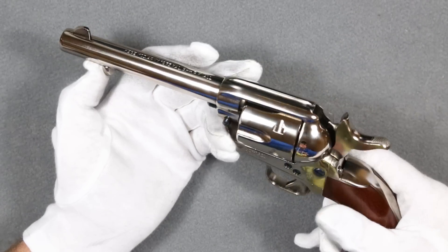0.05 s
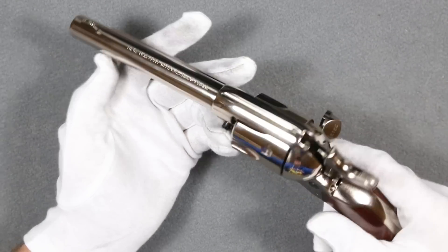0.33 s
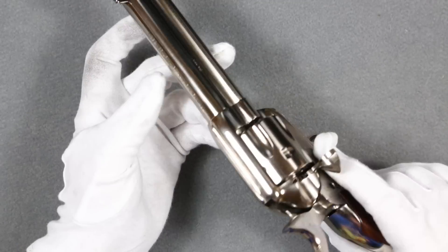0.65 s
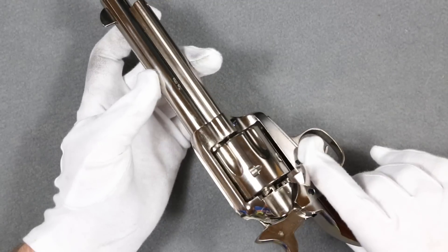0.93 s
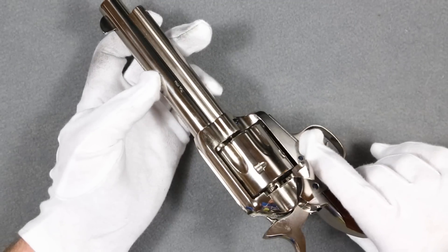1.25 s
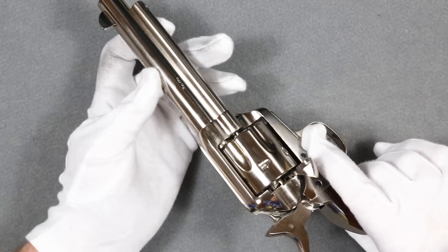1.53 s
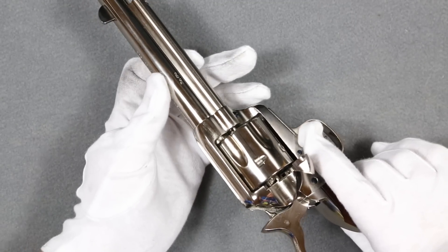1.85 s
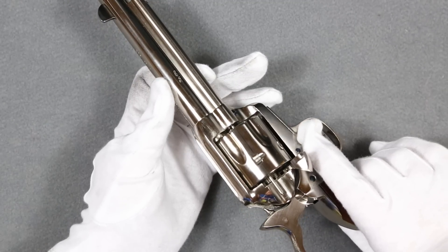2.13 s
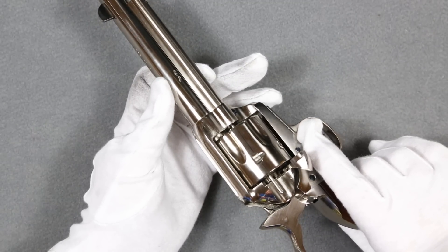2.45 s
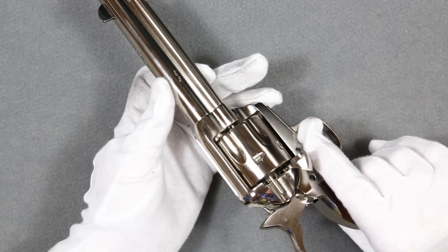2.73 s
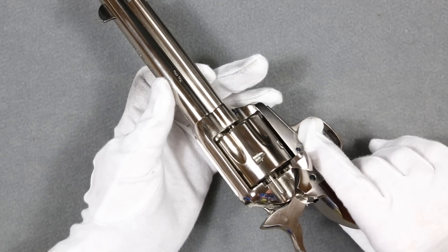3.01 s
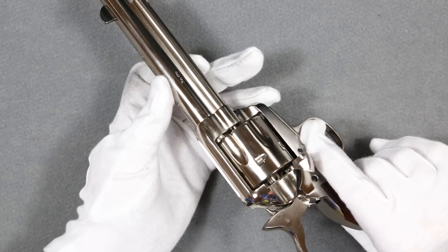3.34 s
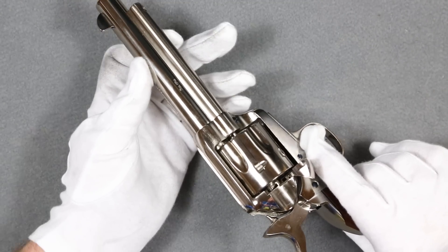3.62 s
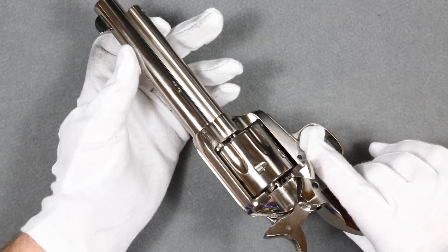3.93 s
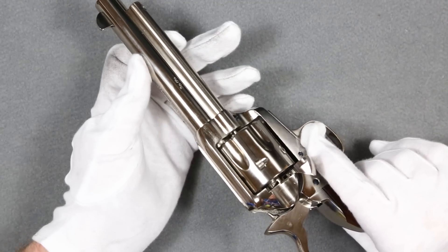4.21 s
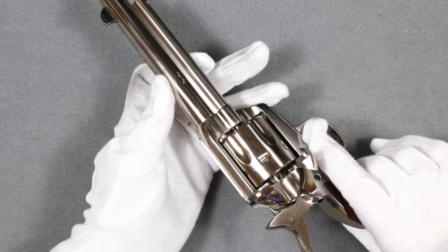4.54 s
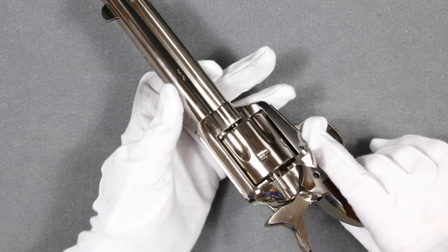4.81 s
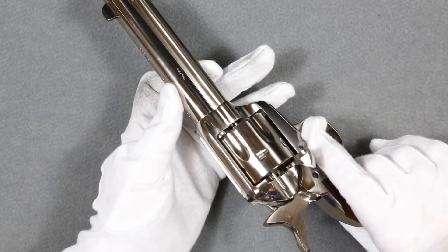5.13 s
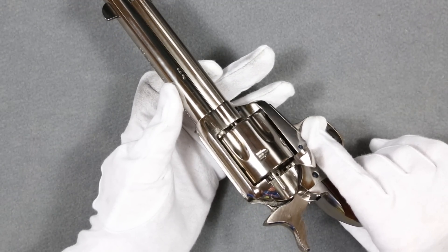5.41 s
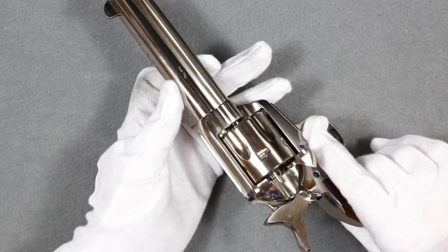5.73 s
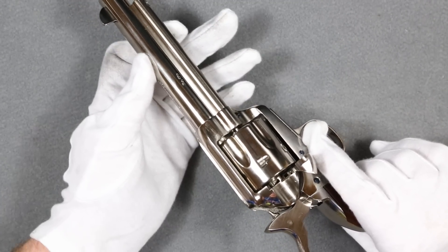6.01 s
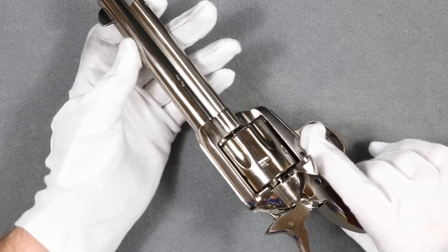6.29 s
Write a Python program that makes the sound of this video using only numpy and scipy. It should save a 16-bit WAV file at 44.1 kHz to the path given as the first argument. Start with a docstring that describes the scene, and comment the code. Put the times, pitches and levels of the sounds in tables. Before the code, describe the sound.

In a small room with a low, steady machine hum, gloved hands work a revolver right by the microphone. Its action gives crisp, quickly damped metal clicks at the start. Three times the spring-loaded rod is pushed to and fro, scraping lightly in its housing while the coils catch and tick. Firmer clicks close the first and last of these passes. The sound is close and fairly dry.

```python
"""A steel revolver, worked in gloved hands close to the microphone in a small room with a low hum.
The action clicks: each contact rings the hand-damped steel for a few milliseconds. The sprung ejector
rod slides along the barrel and back, scraping in tiny slips against its housing, while the coils of
its spring rasp, catch and tick. A cotton glove brushes the steel once. Behind the gun are a faint
echo off the table, a short room tail and the drone of a fan-like machine."""
import sys
import numpy as np
from scipy import signal
from scipy.fft import rfft, irfft, next_fast_len
from scipy.io import wavfile

SR = 44100
rng = np.random.default_rng(int(sys.argv[2]) if len(sys.argv) > 2 else 0)


def generate_wav(signal):
    """Clip the signal to [-1, 1] and save it as 16-bit WAV at the path in sys.argv[1]."""
    frames = np.transpose(np.atleast_2d(signal))
    scaled = np.clip(frames, -1, 1) * 32767
    pcm = np.round(scaled).astype(np.int16)
    wavfile.write(sys.argv[1], SR, pcm)


N = 289418
TIME = np.arange(N) / SR


def gain_of(db):
    """Decibels to amplitude."""
    return 10 ** (np.asarray(db) / 20)


def evened(x):
    """Scales to an rms of one."""
    return x / np.sqrt(np.mean(abs(x) ** 2) + 1e-20)


def total_db(power):
    """Level of the summed power of all bands."""
    return 10 * np.log10(power.sum(0) + 1e-12)


def read(points, hz):
    """Reads a table on a logarithmic frequency axis."""
    f, value = np.transpose(points)
    return np.interp(np.log(hz + 1), np.log(f), value)


def add(mix, s, sound):
    """Mixes a sound in at s seconds."""
    part = mix[max(round(s * SR), 0):][:len(sound)]
    part += sound[:len(part)]


def wander(width_hz, size=2 ** 15):
    """Slow complex random drift of a given bandwidth."""
    t = np.linspace(0, N / SR, size)
    spectrum = rng.standard_normal(size) + 1j * rng.standard_normal(size)
    spectrum *= np.exp(-(np.fft.fftfreq(size, t[1]) / width_hz) ** 2)
    return evened(np.interp(TIME, t, np.fft.ifft(spectrum)))


def noise(colour):
    """Noise of a given colour, at an rms of one."""
    length = next_fast_len(N)
    gain = gain_of(read(colour, np.fft.rfftfreq(length, 1 / SR)))
    return evened(irfft(rfft(rng.standard_normal(length)) * gain, length)[:N])


def causal(gain):
    """The minimum-phase impulse response with this gain: it starts at once and rings out."""
    log_gain = np.log(np.r_[gain, gain[-2:0:-1]] + 1e-6)
    return irfft(np.exp(np.conj(signal.hilbert(log_gain)))[:len(gain)])


def resonate(x, hz, width_hz):
    """A steep resonance that may follow a moving pitch."""
    turn = np.exp(2j * np.pi * np.cumsum(hz * np.ones(len(x))) / SR)
    r = np.exp(-np.pi * width_hz / SR)
    return 2 * (turn * signal.lfilter([(1 - r) ** 2], [1, -2 * r, r * r], x / turn)).real


def bands(hz, edges_hz=(4500, 8000, 11000)):
    """Soft masks for the four bands in which the steel rings, around 3, 6, 9 and 13 kHz."""
    above = [1 / (1 + (edge / (hz + 1)) ** 24) for edge in edges_hz]
    return -np.diff([np.ones(len(hz)), *above, np.zeros(len(hz))], axis=0)


def shares(low_db, high_db, top_db):
    """Band amplitudes, total power one, from a colour: the 3, 9 and 13 kHz bands against 6 kHz."""
    gains = gain_of([low_db, 0, high_db, top_db])
    return gains / np.linalg.norm(gains, axis=0)


def tinted(bright_db, base_db):
    """Colour of a contact: the sharper the edge, the more of the upper bands."""
    return [base + slope * bright_db for base, slope in zip(base_db, (-0.052, 0.48, 0.91))]


def hum(drone_hz=70, swell_s=0.17):
    """Room tone from a fan-like machine: wavering lines and a deep, swelling drone in a rush of air."""
    # colour of the air: f/Hz, relative level/dB
    air = [(15, -50), (25, -35), (37, -10.5), (52, -17.5), (70, -14), (125, -6.5), (175, -7), (225, -2),
           (280, -1.5), (370, -13.5), (620, -13.5), (950, -21), (1400, -21), (2400, -26), (4000, -29),
           (9000, -33.5), (16000, -39.5)]
    # hum lines: f/Hz, level/dB, width of wavering/Hz, steady share/0-1
    lines = [(130.3, -44.5, 6.6, 0.73), (142, -52, 2.5, 0.8), (108, -56, 3.2, 0.84),
             (219.8, -46.5, 10.3, 0.02), (262.4, -47.5, 5.6, 0), (297, -50.5, 1.55, 0.28),
             (428.6, -49.5, 2.3, 0.94), (550.7, -58.5, 8, 0), (626.6, -58.5, 9.3, 0.4),
             (1167, -64.5, 2.2, 0.89), (1335, -64.5, 6, 0), (3276, -61.5, 105, 0)]
    # crests of the drone: t/s, level/dB
    swells = [(4.92, -51), (5.65, -52), (6.37, -48.5)]
    out = gain_of(-39.5) * noise(air)
    for hz, db, width, steady in lines:
        sway = np.sqrt(steady) + np.sqrt(1 - steady) * wander(width)
        tone = np.exp(2j * np.pi * (hz * TIME + rng.random()))
        out += gain_of(db) * evened((sway * tone).real)
    drone = evened(((1 + 0.73 * wander(7)) * np.exp(2j * np.pi * drone_hz * TIME)).real)
    swell = sum(gain_of(db) * np.exp(-((TIME - s) / swell_s) ** 2) for s, db in swells)
    return out + (gain_of(-61.5) + swell) * drone


def room(x):
    """What returns to the microphone: faint echoes off the table, then a tail whose top dies first."""
    # reverberation time: f/Hz, t60/s
    decay = [(500, 0.33), (3000, 0.36), (7000, 0.35), (10000, 0.4), (15000, .2)]
    # strength of the tail: f/Hz, level/dB
    colour = [(500, 6), (3000, -11), (7000, -15), (10000, -16), (15000, -15)]
    count = SR * 3 // 4
    reflections = rng.standard_normal(count) * (rng.random(count) < 5000 / SR)
    hz, t, spectra = signal.stft(evened(reflections), SR, nperseg=256)
    t60 = read(decay, hz)[:, None]
    spectra *= gain_of(read(colour, hz)[:, None] - 60 * t / t60)
    spectra *= np.sqrt(2 * np.log(1000) / (t60 * SR))  # energy independent of decay time
    tail = signal.istft(spectra * np.clip(t / 0.0059, 0, 1), SR, nperseg=256)[1]
    for delay_s, db in [(.0032, -14), (.0068, -19.5), (.0105, -31)]:
        tail[round(delay_s * SR)] += gain_of(db)
    return signal.fftconvolve(x, tail)[:N]


def push(start, rise, fall, db, slow_db=9.5, stop_s=0.017):
    """Amplitude of one hand movement: it gathers speed, slows down and stops (times in s)."""
    from_peak = np.maximum((start + rise - TIME) / rise, (TIME - start - rise) / fall).clip(0, 2)
    moving = np.clip(1 + np.minimum(TIME - start, start + rise + fall - TIME) / stop_s, 0, 1)
    return moving * gain_of(db - slow_db * from_peak ** 1.63)


def glove():
    """Cotton fibres brush the steel in an uneven whisper as the gun is turned over."""
    # colour of the brushing: f/Hz, relative level/dB
    cotton = [(500, -30), (1500, -3), (3500, -2), (5000, -2), (7000, 2), (8500, -5), (10000, -5),
              (13000, -9), (16000, -17)]
    return push(start=.50, rise=.09, fall=0.1, db=-46) * gain_of(2.5 * wander(90).real) * noise(cotton)


def steel(modes, hz, broad_db, shift_db=0):
    """Gain of a steel part: its modes over a broad, dead response; small parts radiate little bass."""
    centre, width, db = np.transpose(modes)[:, :, None]
    peaks = np.sum(gain_of(db + shift_db) ** 2 / (1 + (2 * (hz - centre) / width) ** 2), 0)
    broad = gain_of(broad_db) ** 2 * hz ** 2 / (hz ** 2 + 1500 ** 2)
    return np.sqrt(peaks + broad) * hz / np.hypot(hz, 300)


def friction(slips_per_s, spread_db, judder_db, judder_hz, size=2048):
    """Tiny slips of uneven size, bunched by judder, ring the rod: one row for each band."""
    # modes of the ejector rod in its housing: f/Hz, width/Hz, relative level/dB
    rod_modes = [(1470, 170, -10), (2270, 190, -4.5), (2780, 230, 0), (3280, 300, 4.5), (3870, 190, 3.5),
                 (4240, 320, 1), (5300, 450, 0), (6000, 260, 1), (6730, 300, -3.5), (7280, 290, 4.5),
                 (8930, 700, -1.5), (9850, 300, -1), (10070, 320, -1.5), (12300, 330, -1), (12560, 520, -3),
                 (13460, 490, 0.5)]
    # the thumb damps the rod: t/s, share of dead, broad scraping/0-1
    thumb = [(1.76, 0.84), (1.82, 0.25), (4.1, 0), (4.25, 0.51), (4.40, 0.52), (4.47, 0.18), (6.12, 0.28),
             (6.22, 0.36)]
    slips = (rng.random(N) < slips_per_s / SR) * rng.choice([-1, 1], N)
    slips = slips * gain_of(spread_db * np.minimum(rng.exponential(1, N), 3))
    judder = np.clip(np.sqrt(2) * wander(judder_hz).real, -2, 2)
    slips *= gain_of(judder_db * judder - judder_db ** 2 * np.log(10) / 20)  # keeps the mean power
    hz, length = np.fft.rfftfreq(size, 1 / SR), next_fast_len(N + size)
    damping = np.interp(TIME, *np.transpose(thumb))
    free = evened(steel(rod_modes, hz, broad_db=-28) ** 1.05)  # rod and housing deepen the valleys
    dead = evened(steel(rod_modes, hz, broad_db=-1.5))
    rung = rfft(slips * (1 - damping), length) * rfft(causal(free), length)
    rung += rfft(slips * damping, length) * rfft(causal(dead), length)
    parts = irfft(rung * bands(np.fft.rfftfreq(length, 1 / SR)), length)[:, :N]
    return np.array([evened(part) for part in parts])


def travel():
    """The hand pushes the rod to and fro: rubbing power in each band over time."""
    # pushes: t/s, speeding up/s, slowing down/s, relative level at full speed/dB, brightness/dB
    strokes = [(1.665, 0.034, 0.077, -36, -4), (1.80, 0.065, 0.088, -34, 1),
               (1.995, 0.099, 0.036, -36.5, -3.5), (3.59, .05, 0.14, -34, 1), (3.79, 0.091, .11, -45, -1),
               (4.235, 0.11, .10, -36.5, -0.5), (4.42, .11, .10, -33, 0.5), (4.64, 0.093, 0.065, -38.5, -7),
               (4.88, 0.064, 0.029, -37.5, -0.5), (5.884, 0.093, .08, -32.5, -1.5),
               (5.99, 0.068, .13, -32, 0), (6.17, 0.12, .04, -35, -0.5)]
    return sum(np.outer(shares(*tinted(bright, base_db=(0, -1.5, 0.5))), push(*move)) ** 2
               for *move, bright in strokes)


def slide(power):
    """The rod and its spring rub along the housing; the slower they go, the more they stick and slip."""
    slow = np.clip((-32.5 - total_db(power)) / 8, 0, 1)
    grain = friction(slips_per_s=2500, spread_db=1.5, judder_db=1.8 + 1.25 * slow, judder_hz=130)
    return gain_of(-1.03) * (np.sqrt(power) * grain).sum(0)


def scuffs(rise_s=0.0048, fall_s=0.0017):
    """Steel grips and drags briefly where the thumb presses harder."""
    # short scrapes: t/s, length/s, relative level/dB, brightness/dB
    scrapes = [(0.001, 0.019, -32, -4), (0.025, 0.023, -32, -10), (1.566, 0.02, -37.5, -18),
               (1.59, 0.0064, -34, 0), (1.68, .019, -24.5, 2), (1.704, 0.042, -27, 0),
               (1.962, 0.016, -31, 5), (2.128, 0.0067, -30.5, -4), (2.173, .007, -38, 2),
               (2.224, .011, -32.5, 0), (2.242, 0.0098, -31.5, 3), (2.254, .022, -35, -3),
               (2.309, 0.014, -32, -1), (3.345, .01, -39, 0), (3.453, 0.018, -24.5, -6),
               (3.475, 0.045, -29, -2.5), (3.516, .031, -38, -1), (3.635, 0.0085, -28, 9),
               (3.957, .02, -40.5, -6), (4.026, 0.0089, -41, -3), (4.474, 0.017, -31, -2),
               (4.531, 0.021, -28.5, 7), (4.759, 0.011, -36, 0), (4.783, .013, -34.5, -4),
               (4.914, .0065, -32.5, -8), (4.961, .007, -33, -2), (6.056, 0.03, -28, 2),
               (6.42, 0.0095, -41, -17)]
    power = np.zeros((4, N))
    t = np.arange(SR // 8) / SR
    for s, length, db, bright in scrapes:
        stroke = np.minimum(t / rise_s, 1) * np.exp(-np.maximum(t - length, 0) / fall_s)
        for band, share in zip(power, shares(*tinted(bright, base_db=(0, -.5, 1)))):
            add(band, s - rise_s / 2, (gain_of(db - 3.5) * share * stroke) ** 2)
    grain = friction(slips_per_s=4500, spread_db=3, judder_db=3.0, judder_hz=220)
    return (np.sqrt(power) * grain).sum(0)


def rasps(slips_per_s=2500):
    """Slips of the spring feed one narrow resonance that glides as the coils close."""
    # drags of the spring: t/s, length/s, first f/Hz, last f/Hz, nominal width/Hz, level/dB
    drags = [(1.672, 0.058, 2850, 2900, 160, -39), (1.703, 0.031, 5420, 5360, 220, -31.5),
             (2.268, 0.043, 2270, 2360, 110, -34.5), (2.284, 0.029, 5100, 5160, 500, -30.5),
             (3.448, 0.054, 2300, 2340, 160, -41), (3.450, 0.042, 5850, 5760, 200, -37),
             (3.952, 0.034, 3100, 3100, 420, -34.5), (4.527, 0.052, 4400, 4200, 550, -35.5),
             (5.929, 0.079, 4370, 4060, 600, -35.5), (6.054, 0.039, 3720, 3300, 600, -32.5)]
    out = np.zeros(N)
    t = np.arange(SR // 5) / SR
    for s, length, first_hz, last_hz, width, db in drags:
        slips = rng.standard_normal(len(t)) * (rng.random(len(t)) < slips_per_s / SR)
        ring = resonate(slips, np.interp(t, [0, length], [first_hz, last_hz]), 1.44 * width)
        add(out, s, gain_of(db) * evened(ring) * np.sin(np.pi * np.minimum(t / length, 1)))
    return out


def coil_ticks(power, catches_per_s=14, still_db=-50, bright_db=8, ring_hz=12900, count=96):
    """Lists the spring's firm snaps, and light chance catches whose level follows the rod's speed."""
    # coils snap past the edge of the housing: t/s, relative level/dB, brightness/dB, ring f/Hz
    snaps = [(1.752, -23.5, -1.5, 9300), (1.8399, -18, 5, 9900), (1.8446, -20.5, 5, 13680),
             (1.9343, -35, 0, 7140), (2.3642, -43, 7, 13000), (3.508, -31, -20, 3430),
             (3.5566, -37, -6, 5090), (3.6571, -31, 10, 12740), (3.7546, -22.5, -2, 10400),
             (3.788, -21.5, -0.5, 9800), (3.8178, -24.5, 1, 7100), (3.8523, -30.5, -1, 9830),
             (3.8805, -38, -2, 11900), (4.3785, -27.5, -3, 11500), (4.4323, -19, -0.5, 9300),
             (4.4613, -24, 5, 9860), (4.7662, -36.5, -3, 13040), (4.8073, -38, 10, 10000),
             (6.1476, -21.5, 2.5, 10030), (6.1802, -20, 2, 6800), (6.2073, -22.5, 1, 9300),
             (6.2251, -28, -1, 3260)]
    times = np.cumsum(.5 + rng.random(count)) / catches_per_s
    offsets_db = 2 * rng.standard_normal(count) - 0.5
    sliding_db = np.interp(times, TIME, total_db(power))
    catches = [(s, db + offset, bright_db, ring_hz)
               for s, db, offset in zip(times, sliding_db, offsets_db) if db > still_db]
    return snaps + catches


def click(db, colour, ring_hz, focus, contact_s, size=4096):
    """A brief chatter of contact rings the steel; the place of the blow decides which modes speak."""
    # modes of the gun's steel: f/Hz, width/Hz, relative level/dB
    frame_modes = [(1410, 220, -25), (2380, 100, 0), (2900, 190, 7.5), (3120, 120, 4), (3495, 98, 7.5),
                   (3800, 360, 1), (4050, 130, 5), (4570, 170, 1.5), (5310, 350, -6.5), (5880, 260, 4.5),
                   (6670, 87, -0.5), (7110, 240, 5), (7740, 280, 1), (8670, 280, 0.5), (9230, 220, 1),
                   (9800, 290, -1), (11100, 400, -11), (11760, 340, -6.5), (12700, 210, -2),
                   (14000, 360, -13), (13950, 450, -10), (15800, 500, -9)]
    t, hz = np.arange(size) / SR, np.fft.rfftfreq(size, 1 / SR)
    age = t / max(contact_s, 5e-4)
    spectrum = rfft(rng.standard_normal(size) * age * np.exp(-age * 1.53))
    chatter = irfft(spectrum / np.sqrt(abs(spectrum) + 1e-9))  # hard contacts have a flatter spectrum
    chatter[size // 4:] = 0
    shift_db = 4.2 * rng.standard_normal((len(frame_modes), 1))
    body = steel(frame_modes, hz, broad_db=-22, shift_db=shift_db)
    struck_part = gain_of(16.5) ** 2 / (1 + ((hz - ring_hz) / (0.044 * ring_hz)) ** 2)
    body *= np.sqrt(1 + focus * struck_part)
    masks, balance = bands(hz), shares(*colour)
    band_levels = np.sqrt((masks * abs(body * rfft(chatter)) ** 2).sum(1))
    body *= (balance / band_levels) @ masks
    ring = signal.fftconvolve(chatter, causal(body))[:size]
    # the heavy frame and wooden grip add a dull knock
    jolt = np.diff(rng.standard_normal(size + 1)) * np.exp(-t / 0.0027)
    knock = resonate(jolt, hz=1230, width_hz=800)
    knock *= gain_of(-19.5) * balance[0] / np.linalg.norm(knock)
    return gain_of(db + 24.0) * (ring / np.linalg.norm(ring) + knock)


def action(ticks, focus):
    """Hammer, latch, rod and coils strike the frame; focus brings out the struck part's own ring."""
    # blows: t/s, relative level/dB, 3, 9 and 13 kHz bands against 6 kHz/dB, ring f/Hz, contact/s
    blows = [(0.0216, -28, 2, -20, -21, 3560, 0.00076), (0.0423, -12.5, -2, -13, -29, 2820, .0008),
             (0.2817, -35, 2, -10, -11, 2750, .0009), (0.533, -17.5, 0, 2, -14, 5950, .0012),
             (0.9869, -46, 2, 0, -11, 3480, .001), (1.5528, -41.5, 7, -11, -14, 3240, .0008),
             (1.5984, -25, -7, -5, -12, 7200, .0011), (2.2873, -20, -4, -18, -16, 2330, 0.00077),
             (2.3037, -15, -1, -4, -21, 3850, 0.00041), (3.3545, -32, 4, -10, -11, 3600, .0009),
             (5.0267, -38.5, -5, 8, -8, 8900, .0006), (5.2658, -40, -7, -9, -17, 5500, .0014),
             (6.3228, -21, -2, -4, -11, 6760, 0.0013), (6.3484, -30.5, 1, -5, -14, 2750, 0.0015),
             (6.38, -42, 9, -12, -10, 2760, .0015)]
    out = np.zeros(N)
    for s, db, *colour, ring_hz, contact_s in blows:
        add(out, s, click(db, colour, ring_hz, focus, contact_s))
    for s, db, bright, ring_hz in ticks:
        add(out, s, click(db, tinted(bright, base_db=(-4, 2, 5)), ring_hz, focus, contact_s=.0018))
    return out


def scene():
    """One microphone close to the gun, with the small room and its hum behind."""
    power = travel()
    ticks = coil_ticks(power)
    rubbing = slide(power) + scuffs() + rasps() + glove()
    close = action(ticks, focus=1) + rubbing
    # the room gathers all directions, so no single ring stands out in it
    reflected = room(action(ticks, focus=0) + rubbing)
    return (close + reflected + hum())[None]


def record(dry):
    """The recorder rounds off the hardest peaks and cuts the highest treble."""
    ceiling, edge_hz = .88, 15900
    rounded = dry / (1 + (dry / ceiling) ** 6) ** (1 / 6)
    lowpass = signal.firwin(401, edge_hz, window=("kaiser", 8), fs=SR)
    return signal.oaconvolve(rounded, lowpass[None], "same")


dry = scene()
out = record(dry)
generate_wav(out)
```